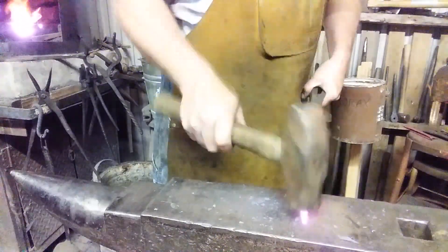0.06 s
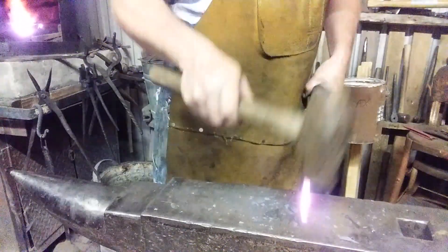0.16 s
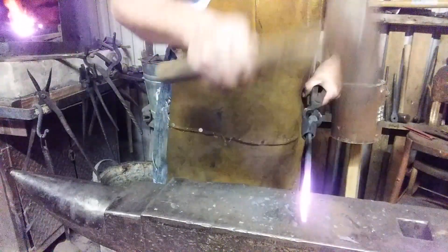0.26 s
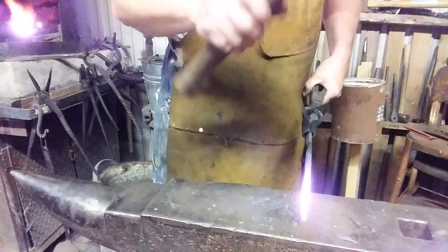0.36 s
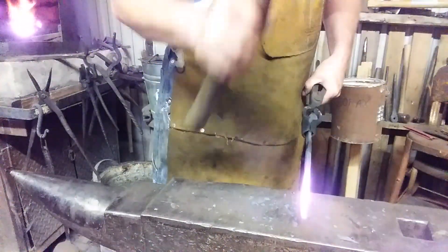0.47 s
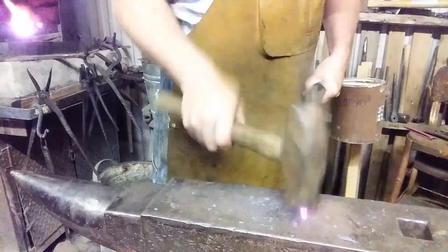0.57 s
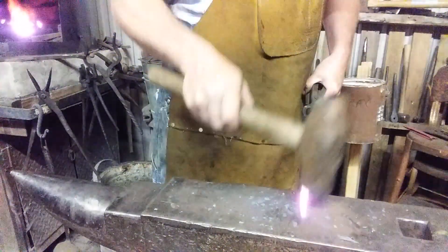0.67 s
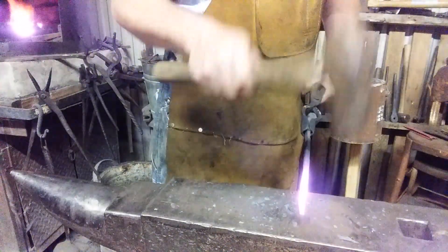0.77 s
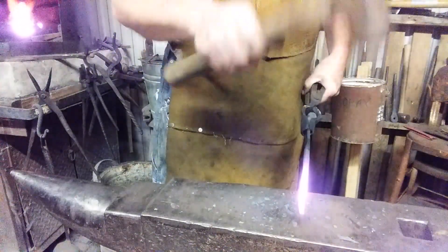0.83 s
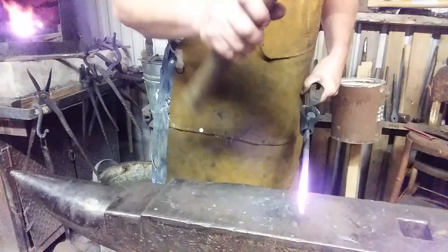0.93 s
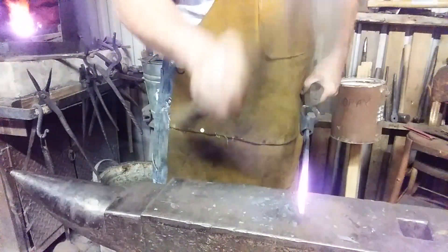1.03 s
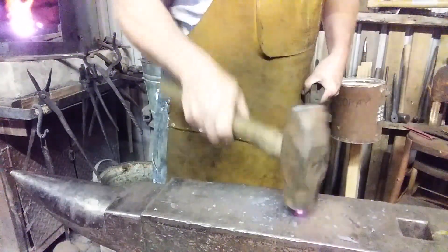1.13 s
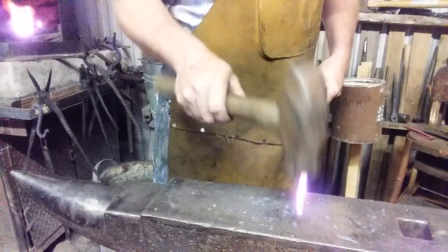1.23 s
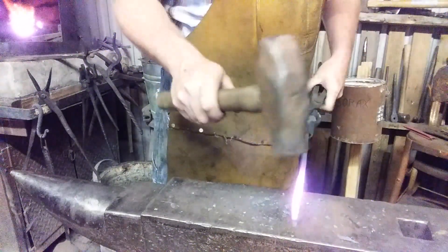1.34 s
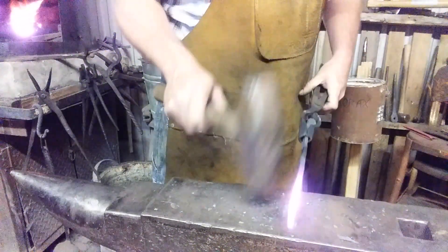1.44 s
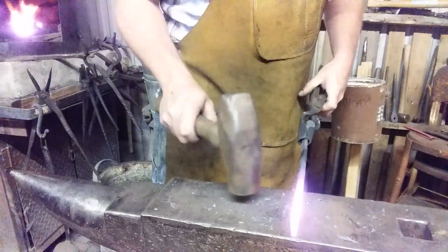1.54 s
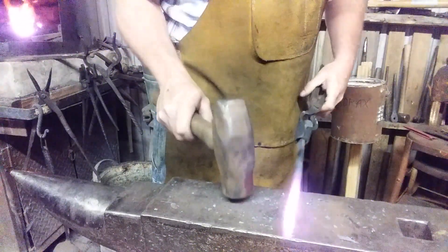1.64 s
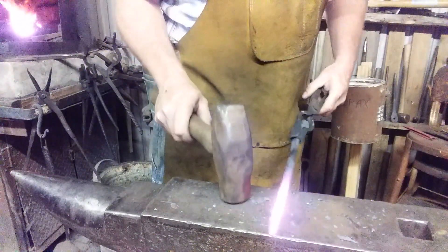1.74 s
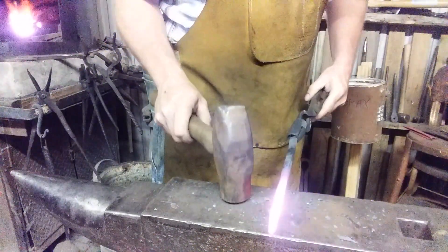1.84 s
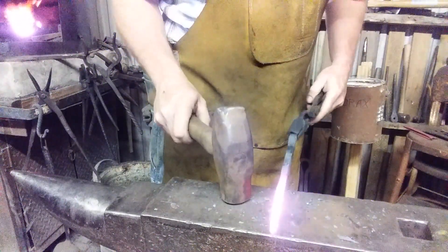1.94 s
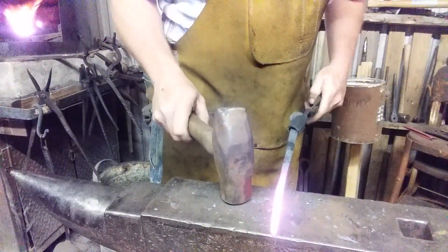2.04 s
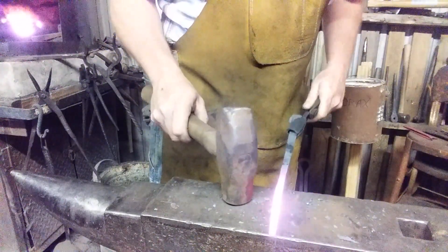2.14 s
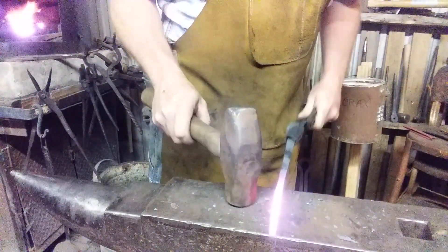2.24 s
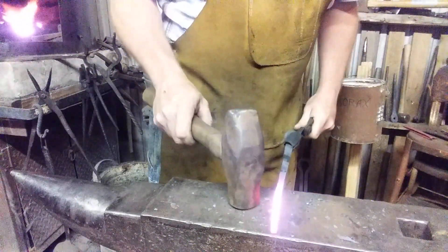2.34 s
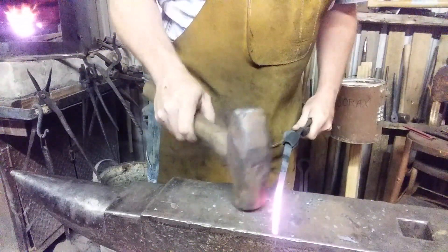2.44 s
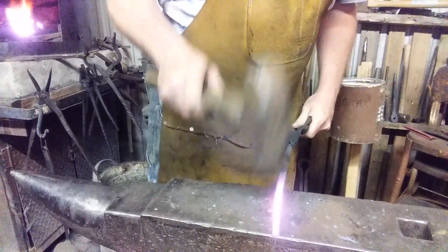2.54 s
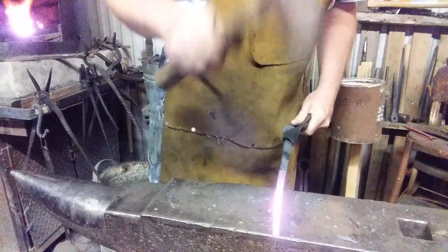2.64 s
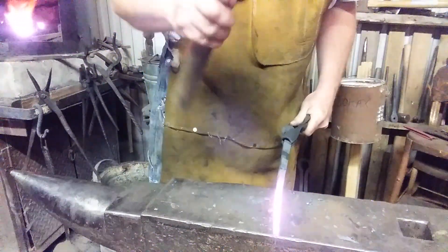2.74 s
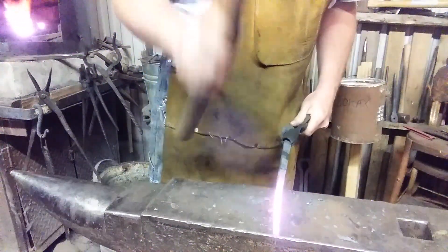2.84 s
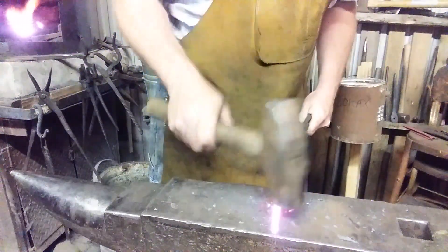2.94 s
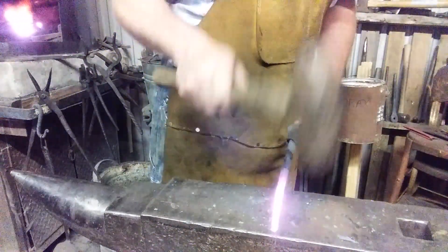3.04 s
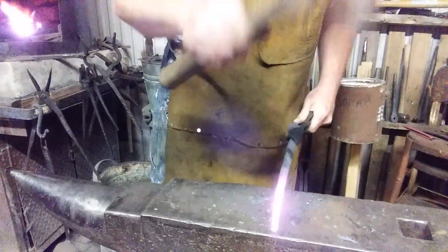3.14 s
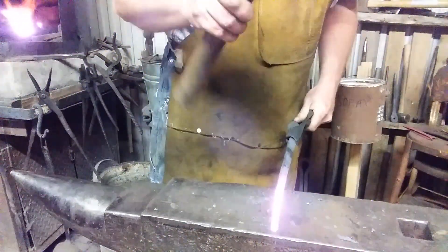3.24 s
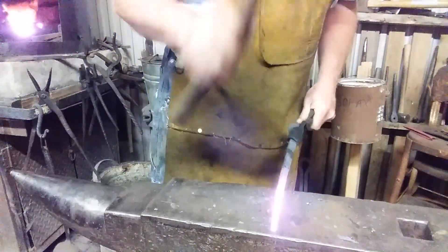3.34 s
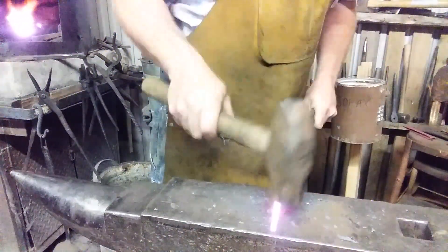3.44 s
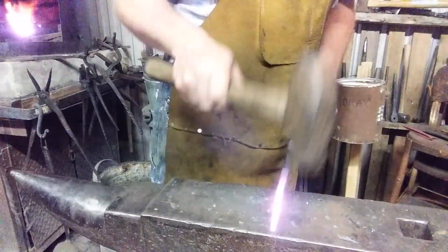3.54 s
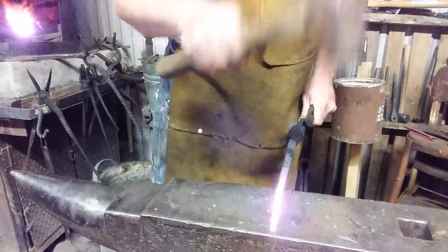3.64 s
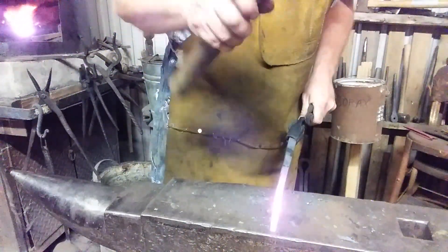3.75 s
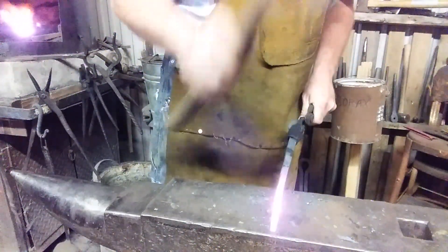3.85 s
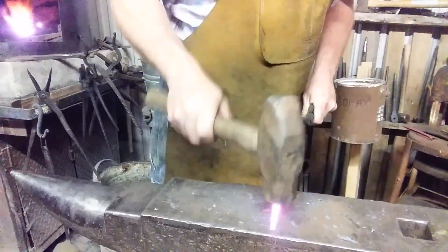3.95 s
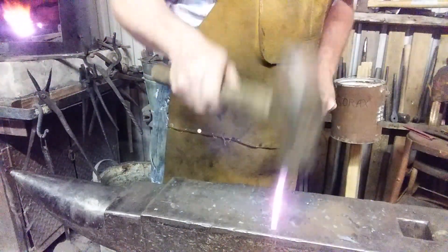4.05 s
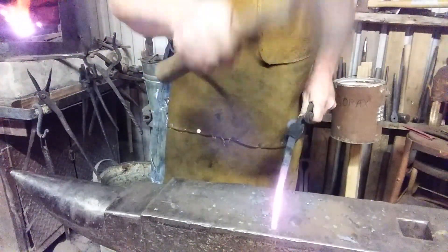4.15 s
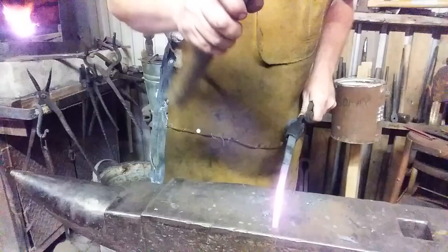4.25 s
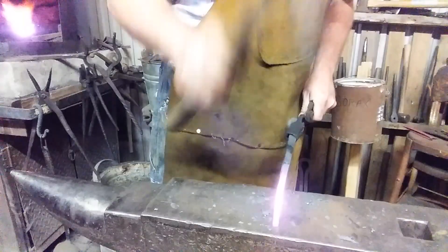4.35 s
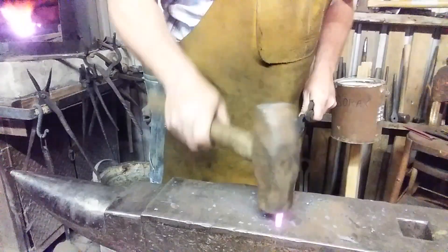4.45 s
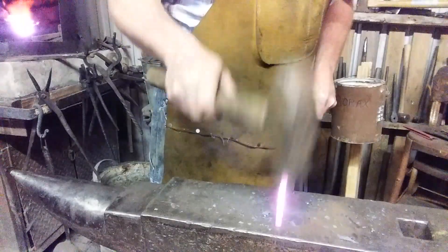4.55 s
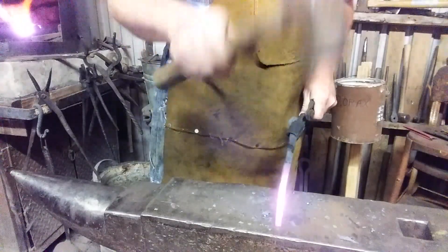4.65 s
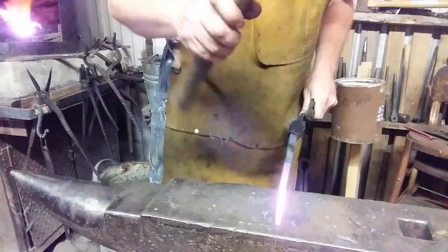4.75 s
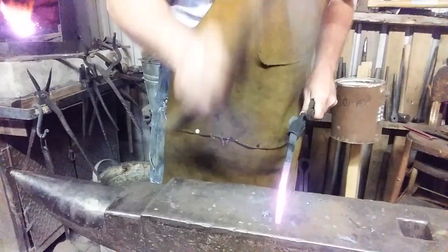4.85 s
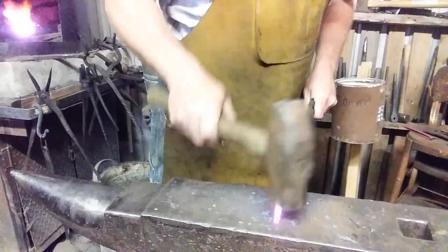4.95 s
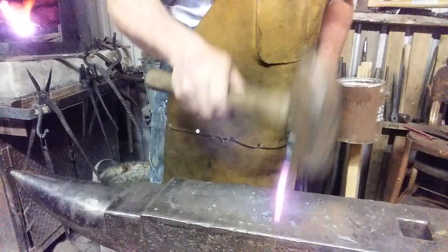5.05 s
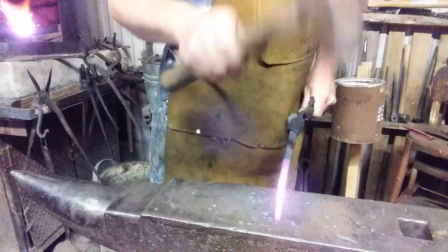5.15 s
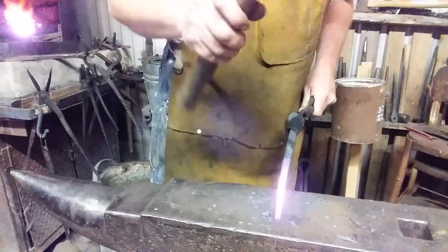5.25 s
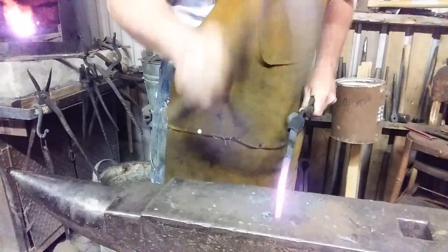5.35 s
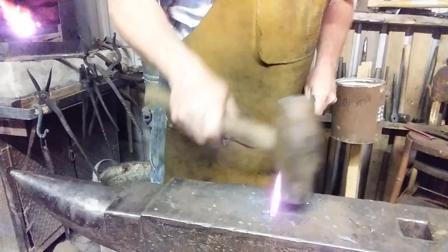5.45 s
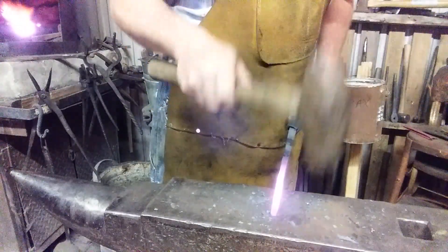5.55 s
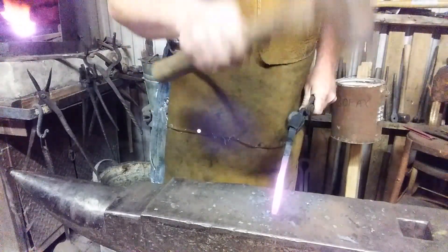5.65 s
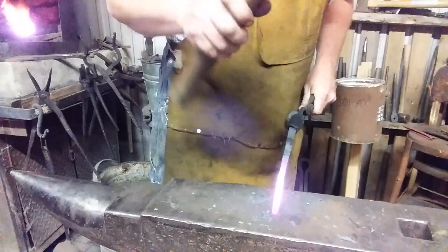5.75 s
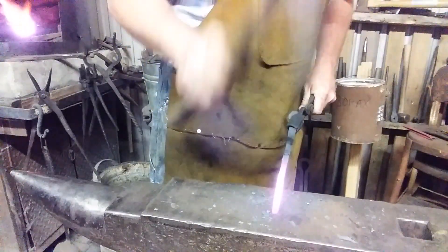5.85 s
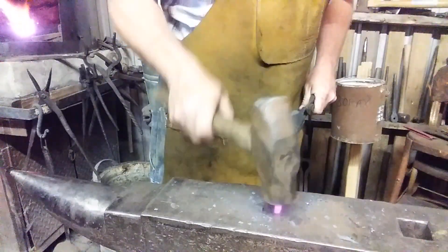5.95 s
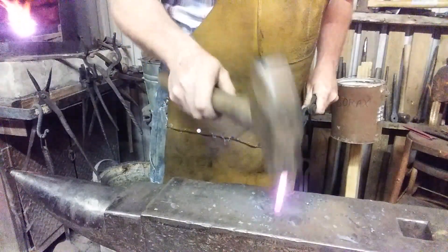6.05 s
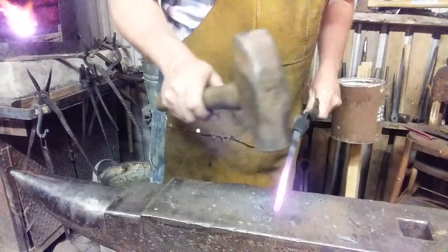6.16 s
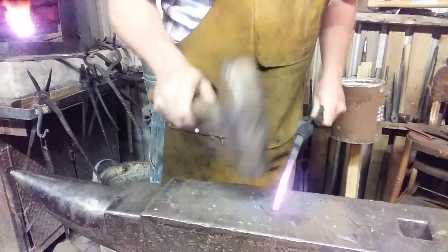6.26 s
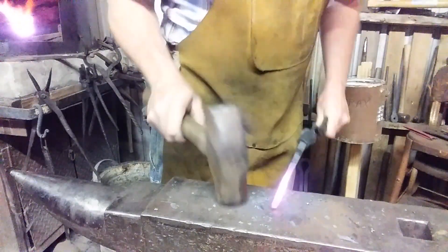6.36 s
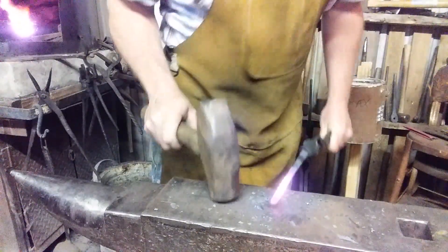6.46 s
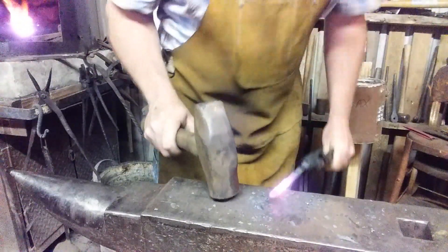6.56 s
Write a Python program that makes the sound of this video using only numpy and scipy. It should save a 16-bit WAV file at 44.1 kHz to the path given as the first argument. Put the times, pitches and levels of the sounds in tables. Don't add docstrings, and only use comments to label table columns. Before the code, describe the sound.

Three firm hammer blows, the second making the tongs ring clearly, then accelerating clinks as the hammer settles on the bare anvil. The forge roar rises in the pause under a faint metal scrape. Seven steady, thudding blows follow with small tong clicks, then three bright bounces. Stereo microphone a metre away, short shed reflections, level ducking under the hammering.

```python
import sys
import numpy as np
from scipy import signal
from scipy.fft import rfft, irfft, next_fast_len
from scipy.io import wavfile
from scipy.ndimage import uniform_filter1d

SR = 44100
rng = np.random.default_rng(int(sys.argv[2]) if len(sys.argv) > 2 else 0)


def field_ratio(decibels):
    return 10 ** (np.asarray(decibels, dtype=float) / 20)


def wrap_up_sound(samples):
    columns = np.atleast_2d(samples).T
    tamed = np.clip(columns, -1, 1)
    steps = np.round(tamed * 32767).astype(np.int16)
    wavfile.write(sys.argv[1], SR, steps)


N = 291060

# start_s, strength_db, hardness_db, toward_horn_cm, tongs_ring_db
BLOWS = [
    (0.0775, -16, 1.5, 13, -25),
    (0.589, -16.5, -1.5, 19, -5.5),
    (1.103, -17, -4, 13, -25.5),
    (2.94, -14, -2, -13.5, -12.5),
    (3.441, -13.5, 0, -7.5, -23),
    (3.936, -16, -12, 2, -13),
    (4.43, -15.5, -2, -2, -21.5),
    (4.927, -15.5, -7, -1.5, -25.5),
    (5.431, -15, -1, -6, -26.5),
    (5.932, -18.5, -9.5, -16.5, -25),
]
# base_db, db_per_hardness_db, db_per_cm, db_per_level_control_db
BLOW_LAW = [
    (3.5, -0.18, 0.0471, 0.85),
    (-2, -0.12, 0.0576, 0.32),
    (-3.44, -0.28, 0.0865, 0.7),
    (-25.5, 0, 1, 0),
    (-1.14, .9, 0, 0),
    (-10.5, 1.15, 0, 0),
    (-23.5, 0.55, -0.17, -0.5),
    (-8, 0.8, 0.145, 0),
]


def hammer_blows():
    return landing(BLOWS, BLOW_LAW)


# start_s, strength_db, hardness_db, toward_horn_cm, tongs_ring_db
BOUNCES = [
    (1.506, -14.5, 2, -8, -39),
    (1.627, -17, -5, 5.5, -40),
    (1.763, -23, -14, 4, -37),
    (1.857, -27, -29, 1, -34),
    (1.897, -34.5, -37, -1.5, -27.5),
    (1.918, -37, -50, -18, -33),
    (6.376, -19.5, -4.5, 2.5, -26),
    (6.496, -17.5, -7, 16, -28.5),
    (6.568, -19.5, -12.5, 17, -28),
]
# base_db, db_per_hardness_db, db_per_cm, db_per_level_control_db
BOUNCE_LAW = [
    (-2, -0.11, -.3, 0.0038),
    (-1.5, 0.33, -0.0029, 0.002),
    (-5, .2, -.05, 0),
    (-18.5, -0.41, 0.97, 0),
    (-1.5, 1.05, 0, 0),
    (-11, 1.8, 0.027, 0.0028),
    (-11.5, 0.82, 0.36, 0),
    (-40, 1.2, 0.18, 0),
]


def bare_bounces():
    return landing(BOUNCES, BOUNCE_LAW)


def landing(rows, law):
    s, db, hard_db, cm, tongs_db = np.transpose(rows)
    causes = [np.ones_like(s), hard_db, cm, gain_db(s)]
    thud, treble, body, horn, waist, *rest = np.array(law) @ causes
    treble = treble + np.clip(3.8 * (-7 - cm), 0, 5.5)
    node_cm, node_width_cm = -11.5, 5.5
    waist = waist + 20 * np.log10(np.clip(abs(cm - node_cm) / node_width_cm, .1, 1))
    return np.array([s, db, thud, treble, *(db + np.array([body, tongs_db, horn, waist, *rest]))])


# pitch_hz, level_db
CRACK = [(24, -46), (40, -23.5), (341, -11.5), (427, -18.5), (656, -9), (1090, -15), (1360, -1.5),
         (1580, -8), (1750, -2.5), (2200, -13.5), (2830, -11), (4230, -25.5), (9240, -28.5), (14900, -22),
         (16500, -42.5)]
# pitch_hz, level_db
CLINK = [(24, -57.5), (40, -31), (156, -8.5), (438, -15.5), (700, -7.5), (1000, -13.5), (1330, -4),
         (2090, -7), (3400, -9.5), (5000, -19.5), (5730, -23), (7200, -18.5), (8700, -40.5), (16500, -42.5)]


def contacts(blows, bounces):
    cracks = crack(blows, CRACK, contact_s=0.0058, direct_db=0.83, shed_db=1.3)
    clinks = crack(bounces, CLINK, contact_s=0.0021, direct_db=2.0, shed_db=-9.5)
    return cracks + clinks


# pitch_hz, fade_60db_s, build_up_s, left_right_likeness_0_to_1,
# left_minus_right_db
SHED = [(46.3, 0.41, 0.014, 0.7, 9.5), (86, 0.3, 0.0033, 1, 7), (192, 0.27, 0.0027, 0.8, 0),
        (326, 0.27, 0.0017, 0.85, 0), (800, 0.19, 0.00067, 0.5, 1), (1526, 0.24, 0.0077, 0.3, 1.5),
        (2790, 0.3, 0.00089, 0.12, 1.3), (5680, 0.31, 0.0084, 0.4, 2), (10700, 0.26, 0.006, 0, 3.5)]


def crack(hits, colour, contact_s, direct_db, shed_db):
    s, db, thud_db, treble_db = hits[:4]
    size, wide = 2 ** 14, next_fast_len(N + 2 ** 14)
    t = np.arange(size) / SR
    pair, hz = coloured(colour, size)
    random_sign = pair[1].real / np.maximum(abs(pair[1]), 1e-9)
    bands_db = 9.0 * uniform_filter1d(uniform_filter1d(random_sign, size=40), size=40)
    pair = pair * field_ratio(3.5 * bands_db * np.clip(hz / 4000, 0, 1))
    ragged = rng.standard_normal((len(s), 512)) * np.exp(-t[:512] / contact_s)
    ragged[:, 0] = np.sqrt(2 * contact_s * SR)
    ragged /= np.sqrt(np.sum(ragged ** 2, axis=1, keepdims=True))
    where = (s * SR).astype(int)[:, None] + np.arange(512)
    direct_shape = field_ratio(direct_db) * np.exp(-t / 0.0036) * (1 - np.exp(-t / 0.000094)) ** 2
    out = 0
    for centre_hz, t60, rise_s, likeness, pan_db in SHED:
        part = irfft(pair * band(hz, centre_hz, 0.93), size)
        direct = direct_shape * ports(part, likeness + 0.091, pan_db)
        tail_shape = field_ratio(shed_db - 60 * t / t60) * (1 - np.exp(-t / rise_s))
        tail = tail_shape * ports(part, likeness, pan_db)
        low_share = np.clip(np.log2(1000 / centre_hz), 0, 1)
        high_share = np.clip(np.log2(centre_hz / 3000), 0, 1)
        tilt_db = thud_db * low_share + treble_db * high_share
        push = np.zeros(wide)
        push[where] = ragged * field_ratio(db + tilt_db)[:, None]
        out = out + rfft(push) * rfft(direct + tail, wide)
    return irfft(out, wide)[:, :N]


# pitch_hz, after_blow_db, after_bounce_db, fade_60db_s, left_minus_right_db, left_leads_rad
BODY = [(1349, -1, -2, .35, -3, -2.4), (732, -18, -15, .22, 0, 1.4), (999, -14, -23, .18, -4, -2.2),
        (1497, -12, -12, .36, 6, -2.8), (1689, -2, -4, .2, 6, 2.4), (1821, -2, -4, .14, 2, 2.6),
        (1863, -1, -3, .13, 0, .3), (2372, -8, -13, .19, 0, .6), (2520, -7, -13, .15, -2, .3),
        (2898, -8, -8, .22, 0, 1.1), (3270, -17, -19, .18, -1, .6), (9835, -14, -10, .08, 3, -1.2)]
TONGS = [(2750, -4, -6, .7, 0, 2.5)]
HORN = [(3741, -4, -6, .62, 2, 2.1), (11020, -21, -48, .3, 3, -.2)]
WAIST = [(4044, -2, 2, .11, -3, -.9), (5365, -11, -17, .17, -3, -3), (6051, -22, -24, .17, -3, 1),
         (8060, -17, -27, .17, 6, -2.6)]
HEEL = [(4543, -3, -2, .45, 2, 1.7), (9781, -9, -26, .3, 6, -1.2)]
FACE = [(5126, -4, -8, .5, -3, .1), (4765, -6, -8, .52, 5, .9), (15610, -15, -40, .3, 1, -1.2)]
HEAD = [(11753, -1, 12, .15, 3, .8), (6572, -7, 0, .22, 0, .5), (6918, -12, 1, .17, -2, -.6),
        (7381, -12, 0, .2, 1, 2.4), (12145, -8, 7, .12, 1, -1.8), (13600, -19, 3, .1, 1, -.3),
        (14650, -19, -2, .1, 0, -3), (7101, -9, -4, .12, 2, .8), (10365, -17, 4, .14, 2, 1),
        (11400, -18, -12, .2, 0, -1), (14150, -17, -3, .22, 1, .7), (14910, -20, 3, .13, 0, -.8),
        (15285, -23, -3, .18, 0, 1.5), (15420, -15, 7, .1, 1, .4)]


def ring(blows, bounces):
    hits = np.hstack([blows, bounces])
    bare = np.arange(hits.shape[1]) >= blows.shape[1]
    side = np.array([[.5], [-.5]])
    out = np.zeros((2, N))
    for family, share_db in zip((BODY, TONGS, HORN, WAIST, HEEL, FACE, HEAD), hits[4:]):
        for hz, blow_db, bounce_db, t60, pan_db, lead in family:
            scatter_db = 1.5 * rng.standard_normal(len(bare))
            gains = field_ratio(share_db + np.where(bare, bounce_db, blow_db) + scatter_db)
            z = mode(struck(hits[0], gains, hz), hz, t60)
            turn = field_ratio(pan_db * side) * np.exp(1j * lead * side)
            out += turn.real * z.imag + turn.imag * z.real
    return out


def struck(times, gains, hz, size=40):
    n, x = np.arange(size), np.zeros(N + size, complex)
    push = np.hanning(size) / np.hanning(size).sum() * np.exp(2j * np.pi * hz * n / SR)
    x[(times * SR).astype(int)[:, None] + n] = gains[:, None] * push
    return x[:N]


def mode(x, hz, t60):
    turn_and_fade = np.exp(2j * np.pi * hz / SR - np.log(1000) / (t60 * SR))
    return signal.lfilter([1], [1, -turn_and_fade], x)


# start_s, level_db, pitch_hz
TICKS = [(0.4551, -67, 9000), (0.979, -65.5, 9010), (.992, -49, 4200), (.993, -56, 10500),
         (2.27, -65, 9000), (4.809, -57.5, 4000), (4.841, -54.5, 4000), (4.855, -63.5, 4000),
         (5.283, -58.5, 3800), (5.297, -59.5, 3900), (5.313, -52, 4000), (5.83, -61, 3900)]


def tong_ticks():
    s, db, _ = np.transpose(TICKS)
    click = mode(train(s, field_ratio(db - 10)), 1900, .015)
    touch = np.eye(1, 512)[0]
    for s, db, hz in TICKS:
        click[int(s * SR):][:512] += field_ratio(db) * mode(touch, hz, .004)
    return click.imag * np.ones((2, 1))


# time_s, level_db
DRAG = [
    (1.982, -120),
    (2.05, -102),
    (2.202, -95),
    (2.35, -94.5),
    (2.45, -120),
]


def hammer_drag():
    s, db = np.transpose(DRAG)
    rub = rng.standard_normal(N) * field_ratio(np.interp(np.arange(N) / SR, s, db) + 3.0 * walk(30))
    drag = field_ratio(7) * mode(rub, 2350, .05) + field_ratio(-16) * mode(rub, 9830, .12)
    return drag.imag * np.ones((2, 1))


def shed(x, t60=0.28):
    t = np.arange(SR // 4) / SR
    walls = rng.standard_normal((2, len(t))) * field_ratio(-36 - 60 * t / t60)
    return x + signal.fftconvolve(x, walls, axes=1)[:, :N]


# pitch_hz, level_db (per Hz)
ROAR = [(15, -51), (25, -29.5), (46, -13.5), (79, -2.5), (172, -6), (202, -3.5), (339, -4), (380, 1.5),
        (419, -6.5), (484, -2.5), (1200, -21.5), (1560, -48), (2640, -120)]
# pitch_hz, level_db (per Hz)
HISS = [(470, -32), (800, -6), (1460, -12.5), (1590, -13.5), (1970, -14), (4130, -32.5), (5110, -34),
        (8230, -44.5), (14800, -49.5), (16000, -42)]


def forge():
    t, swell, out = np.arange(N) / SR, walk(1.5), 0
    for table, db in ((ROAR, -51.5), (HISS, -59)):
        pair, hz = coloured(table, N)
        slow_db = db + gain_db(t) + 1.3 * swell
        for centre_hz in table[0][0] * 2. ** np.arange(7):
            likeness = 1.1 - 0.31 * np.log2(centre_hz / 150) ** 2
            part = ports(irfft(pair * band(hz, centre_hz, 0.91), N), likeness, .6)
            out = out + part * field_ratio(slow_db + 1.2 * walk(24))
    return out


# time_s, gain_db
GAIN = [(0, 8.5), (.13, 5.5), (.3, 2), (.9, 0.6), (1.4, -1.5), (2.05, -2.5), (2.3, -1.2), (2.62, 2.5),
        (2.97, 8), (3.47, 3), (3.69, -2.2), (4.5, -1.9), (4.8, -5), (5.6, -4), (6.6, -1.5)]


def gain_db(s):
    return np.interp(s, *np.transpose(GAIN))


def coloured(table, size):
    hz = np.maximum(np.fft.rfftfreq(size, 1 / SR), 1)
    knots, db = np.transpose(table)
    gain = field_ratio(np.interp(np.log(hz), np.log(knots), db))
    return rfft(rng.standard_normal((2, size))) * gain / np.sqrt(np.mean(gain ** 2)), hz


def band(hz, centre_hz, octaves):
    return np.cos(np.pi / 2 * np.clip(np.log2(hz / centre_hz) / octaves, -1, 1))


def ports(pair, likeness, pan_db):
    likeness = np.clip(likeness, 0, 1)
    mid, side = pair[0] * np.sqrt(1 + likeness), pair[1] * np.sqrt(1 - likeness)
    left = (mid + side) * field_ratio(pan_db / 2)
    right = (mid - side) * field_ratio(-pan_db / 2)
    return np.array([left, right]) / np.sqrt(2)


def train(times, gains):
    x = np.zeros(N)
    x[(np.asarray(times) * SR).astype(int)] = gains
    return x


def walk(rate):
    k = int(SR / rate)
    steps = np.repeat(rng.standard_normal(N // k + 1), k)
    return np.sqrt(2) * uniform_filter1d(uniform_filter1d(steps, k), k)[:N]


def scene():
    blows, bounces = hammer_blows(), bare_bounces()
    hammer = contacts(blows, bounces)
    ringing = field_ratio(1.4) * ring(blows, bounces)
    small_sounds = tong_ticks() + hammer_drag()
    return hammer + shed(ringing + small_sounds) + forge()


def band_limit(x):
    return signal.sosfilt(signal.butter(12, 16850, fs=SR, output="sos"), x)


def record(dry):
    bass_cut = signal.butter(3, 50, "high", fs=SR, output="sos")
    top_cut = signal.ellip(8, .3, 45, 15800, fs=SR, output="sos")
    rounded = np.tanh(0.99 * signal.sosfilt(bass_cut, dry)) / 0.85
    mix = signal.sosfilt(top_cut, rounded)
    return band_limit(mix)


dry = scene()
out = record(dry)
wrap_up_sound(out)
```